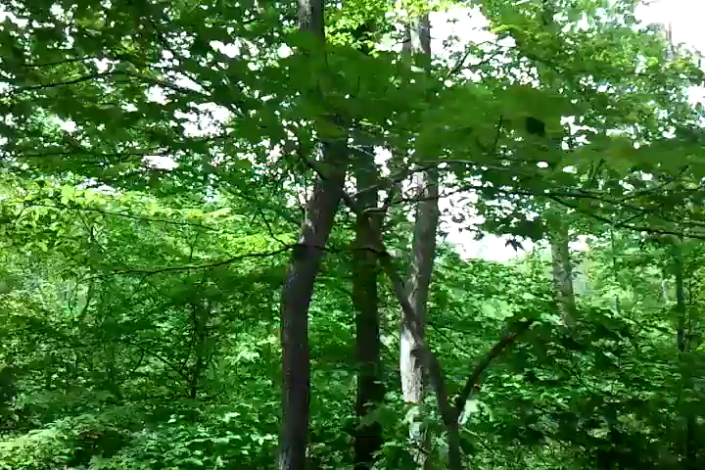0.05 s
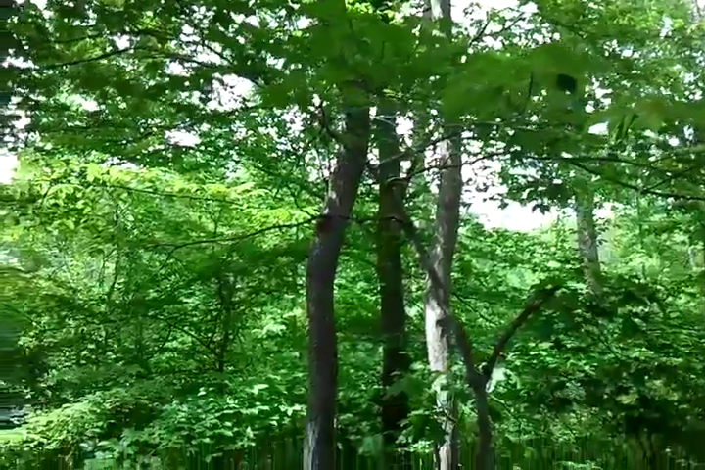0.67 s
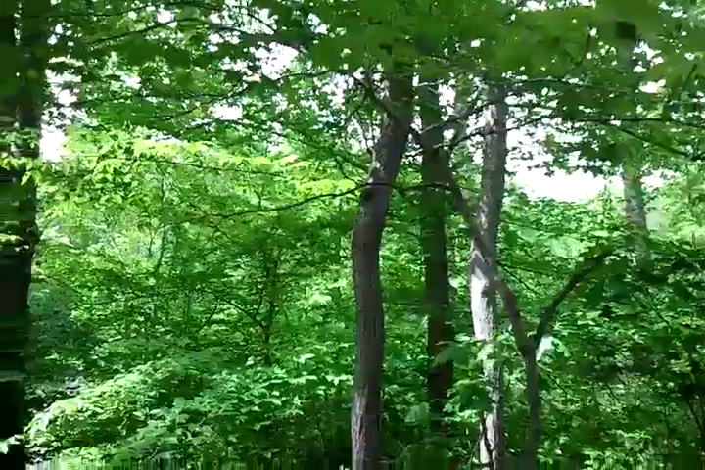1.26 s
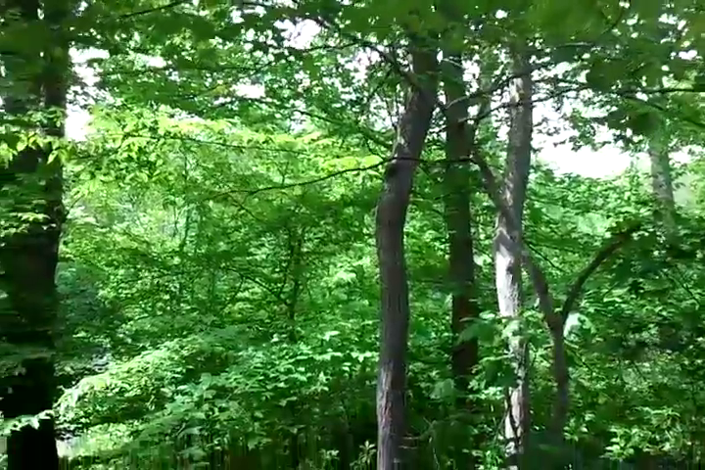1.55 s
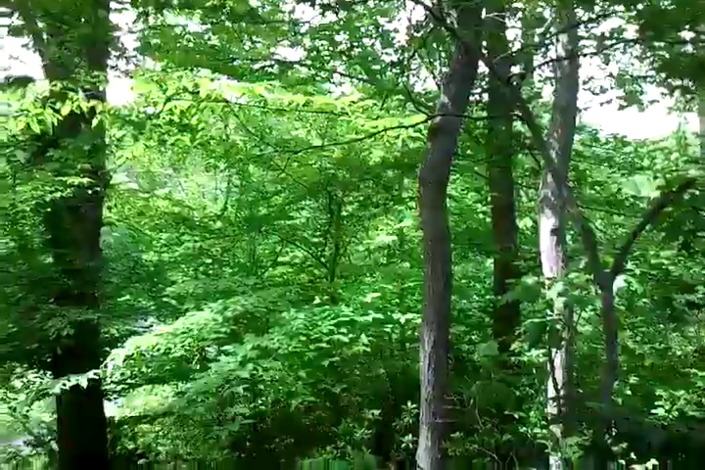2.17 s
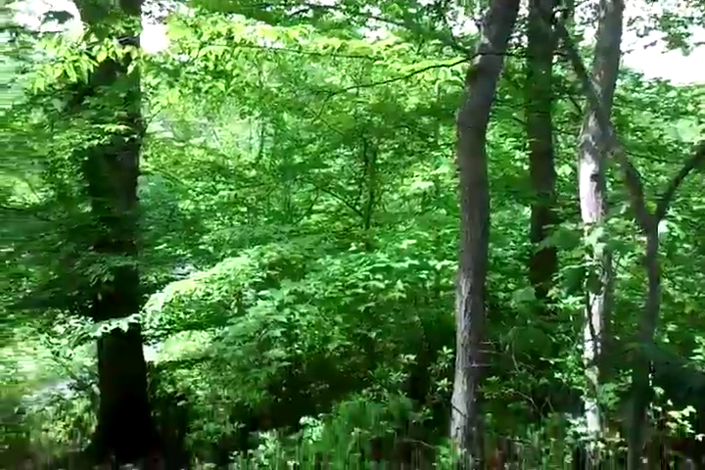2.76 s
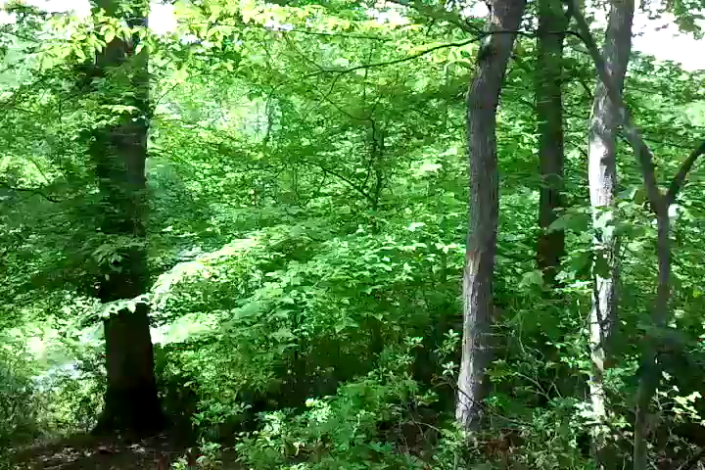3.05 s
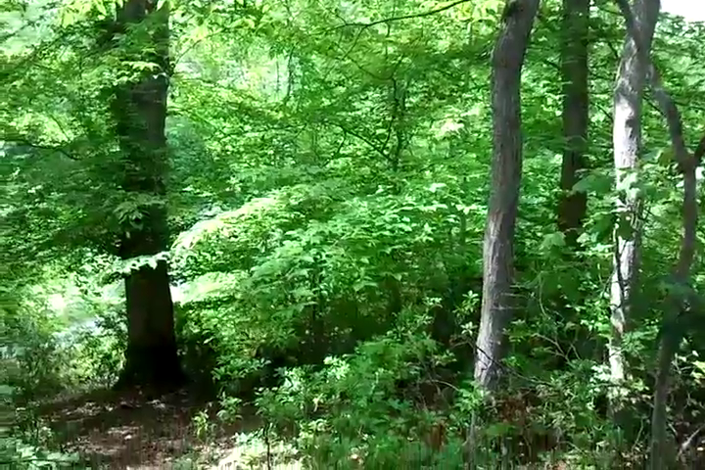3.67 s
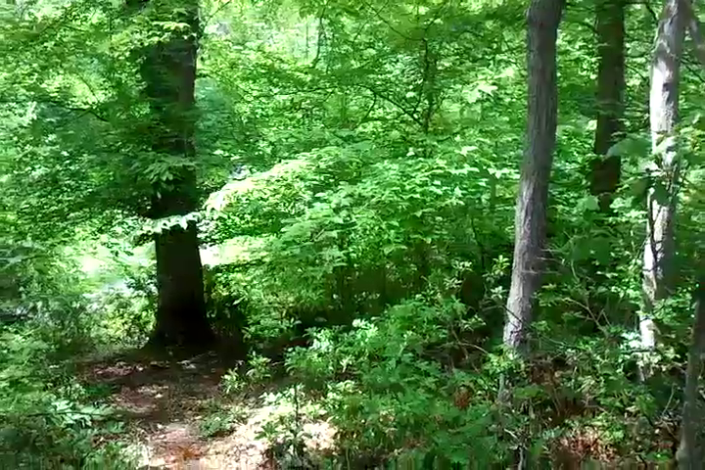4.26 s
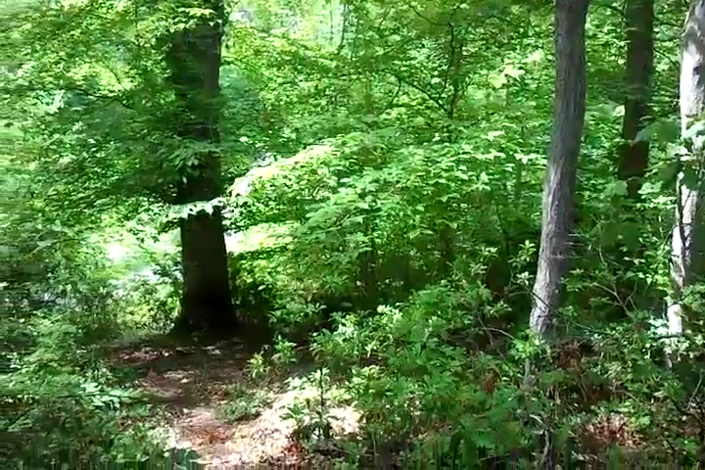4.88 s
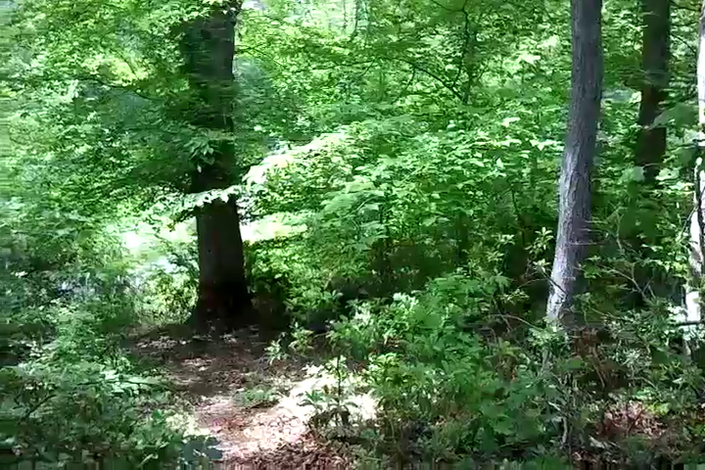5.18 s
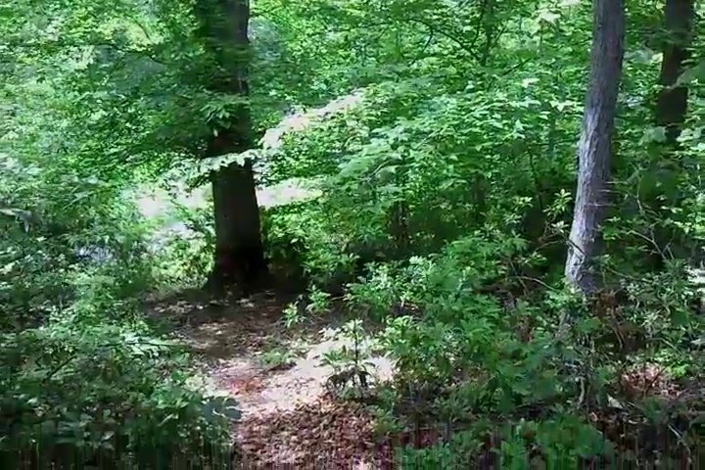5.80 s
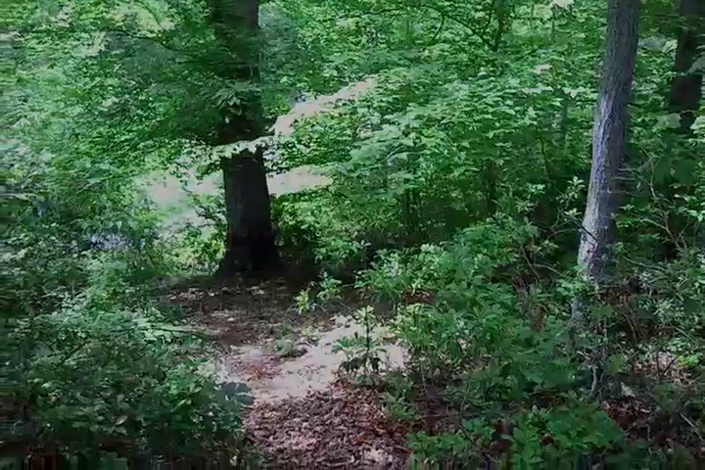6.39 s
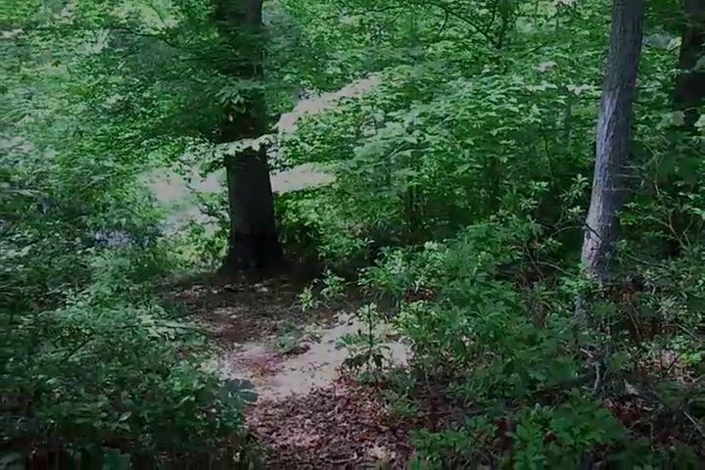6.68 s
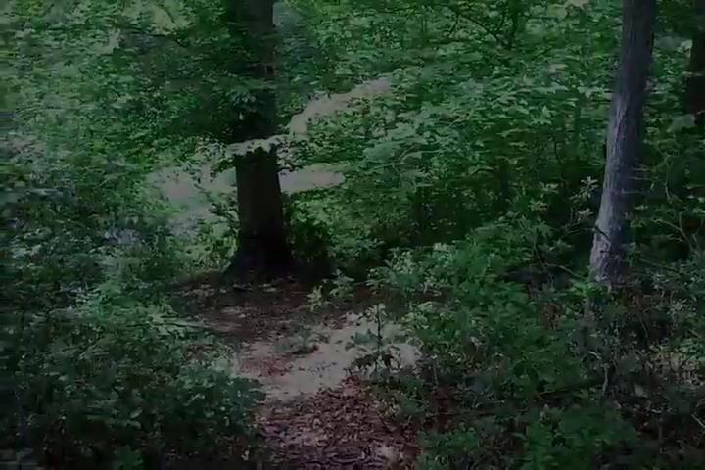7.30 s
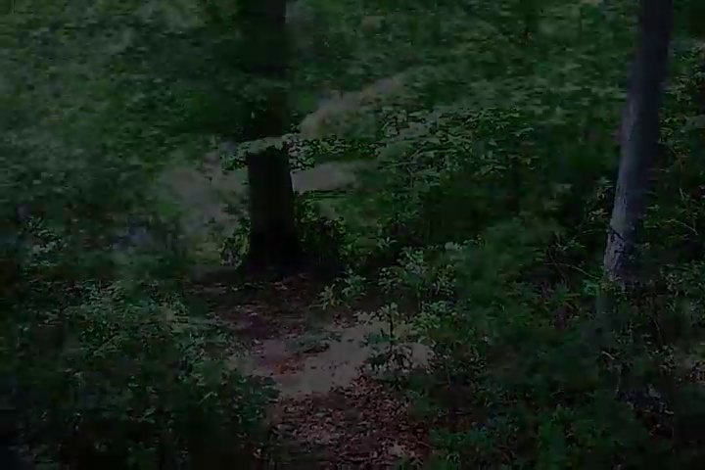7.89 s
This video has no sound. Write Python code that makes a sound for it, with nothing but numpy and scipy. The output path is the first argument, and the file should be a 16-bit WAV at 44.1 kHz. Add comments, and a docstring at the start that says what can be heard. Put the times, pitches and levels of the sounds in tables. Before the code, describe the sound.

Thousands of cicadas drone on one steady pitch high in forest trees, over a distant low rumble, soft treetop hiss and a faint shrill insect. The microphone distorts, giving the drone a harsh buzz. About five seconds in, the sound sputters and breaks up, then returns smooth and fades away. A bird gives a few faint, high chips near the end.

```python
"""A forest, where thousands of cicadas drone on one pitch high in the trees, their tymbals driving
resonant abdomens. Behind them lie distant rumble, treetop hiss and a far, shrill insect; a bird
chips near the end. The recorder's input sits far off centre, so the troughs of the drone are cut
flat and it buzzes, then sputters. As the sound fades the offset drifts back and the drone turns smooth."""
import sys
import numpy as np
from scipy import signal
from scipy.fft import rfft, irfft, next_fast_len
from scipy.io import wavfile

SR = 44100
rng = np.random.default_rng(int(sys.argv[2]) if len(sys.argv) > 2 else 0)


def dump_mix(stems):
    """Bounce the given channels to the path in sys.argv[1] as a 16-bit WAV at rate SR."""
    frames = np.atleast_2d(stems).T  # one column per channel
    limited = np.clip(frames, -1, 1)  # hard clip at full scale
    pcm = np.round(limited * 32767).astype(np.int16)
    wavfile.write(sys.argv[1], SR, pcm)


N = 354696

# Tones of the electronics. Each row: frequency in Hz, rms level in dB.
WHINE_TONES = [(7800, -90.5), (11698, -99)]
# Spectra of the noise bands. Each row: frequency in Hz, relative spectral density in dB.
RUMBLE_SPECTRUM = [(20, -3), (60, 1), (130, 0.5), (190, -2), (240, -7.5), (305, -4.5), (360, -10),
                   (600, -14), (900, -18.5), (2000, -49.5)]
TREETOP_SPECTRUM = [(900, -22.5), (1900, 2), (2500, 1), (2950, -3.5), (3300, -9), (4300, -10.5),
                    (5000, -18), (5500, -22.5), (6000, -34), (6400, -33.5), (7200, -57.5)]
CHORUS_SPECTRUM = [(650, -64), (780, -31.5), (870, -18), (1000, -20), (1100, -16.5), (1200, -6.5),
                   (1280, -4), (1355, 0), (1425, -2), (1500, -10), (1650, -19.5), (1900, -30.5),
                   (2400, -43.5), (3200, -72.5)]
SHRILL_SPECTRUM = [(4800, -24.0), (5500, 2.5), (6100, -1.5), (6900, -25.0)]
# The bird's chips. Each row: start and length in seconds, first and last pitch in Hz, peak level in dB.
BIRD_NOTES = [(7.008, .035, 4750, 4100, -52), (7.43, .05, 4820, 4720, -53), (7.495, .072, 4710, 4770, -56),
              (7.564, .055, 3360, 3060, -49.5), (7.587, .015, 3130, 2510, -46),
              (7.71, 0.026, 4850, 3500, -49), (7.771, .036, 3960, 2760, -48)]
# Dips in the drone. Each row: centre and length in seconds, gain at the centre in dB.
DRONE_LULLS = [(4.986, 0.046, -3), (5.147, .035, -13), (5.218, .025, -5), (5.316, .028, -13),
               (5.417, .03, -4), (5.659, .03, -4)]
# Single rasps of the drone. Each row: centre and length in seconds, crest in dB over the forest level.
DRONE_SURGES = [(0.545, 0.01, 7), (0.663, 0.026, 10), (4.24, .012, 11), (4.671, 0.0079, 11.5),
                (4.88, 0.018, 10), (5.071, 0.0087, 10), (5.18, 0.015, 7), (5.282, 0.012, 11),
                (5.327, 0.0058, 9.5), (5.361, 0.0065, 10.5), (5.392, 0.014, 9), (5.63, 0.0087, 9),
                (6.397, .016, 8.5), (6.52, 0.019, 11.5)]
# Chorus and air hold, then fade. Each row: time in seconds, gain in dB.
FOREST_LEVEL = [(0, -19.5), (3.6, -19), (4.12, -22), (4.3, -19.3), (5.3, -18.8), (6.1, -21), (7.0, -26),
                (7.7, -27.5), (8.04, -34)]
# The input's resting level drifts about the lower rail, sinks below it, then recovers.
# Each row: time in seconds, offset as a fraction of full scale.
INPUT_OFFSET = [(0, -0.72), (1.2, -0.72), (1.68, -0.69), (1.83, -.65), (2.2, -.67), (2.5, -.72),
                (2.9, -.695), (3.92, -0.71), (4.16, -.605), (4.33, -.72), (4.92, -.782), (5.28, -.835),
                (5.68, -.805), (5.83, -.72), (6.3, -.59), (6.95, -0.4), (7.55, -0.31), (8.04, -0.17)]


def amp(db):
    """Decibels to amplitude ratio."""
    return 10 ** (np.asarray(db) / 20)


def unit(x):
    """Normalisation to rms 1."""
    return x / np.sqrt(np.mean(x ** 2) + 1e-20)


def curve(rows):
    """Linear interpolation of (seconds, value) rows at every sample."""
    return np.interp(np.arange(N) / SR, *np.transpose(rows))


def wobble(rate):
    """Random modulation of rms 1, with rate knots a second."""
    at = np.arange(N) * rate / SR
    knots = rng.standard_normal(int(at[-1]) + 2)
    return unit(np.interp(at, np.arange(len(knots)), knots))


def bump(centre_s, length_s):
    """A raised-cosine window, from 0 to 1 and back."""
    u = (np.arange(N) / SR - centre_s) / length_s
    return np.where(np.abs(u) < .5, np.cos(np.pi * u) ** 2, 0)


def filtered(x, response):
    """Linear filtering: the spectrum of x is multiplied by a frequency response."""
    size = next_fast_len(N + SR // 4)
    return irfft(rfft(x, size) * response(np.fft.rfftfreq(size, 1 / SR)), size)[:N]


def noise(spectrum):
    """Spectral shaping: noise of rms 1 follows (Hz, dB) points on a log frequency axis."""
    points_hz, db = np.transpose(spectrum)

    def response(hz):
        return amp(np.interp(np.log(hz + 1), np.log(points_hz), db, right=-120))
    return unit(filtered(rng.standard_normal(N), response))


def electronics():
    """Self-noise: the recorder's circuits add a thin whine and white hiss."""
    t = np.arange(N) / SR
    whine = sum(np.sqrt(2) * amp(db) * np.sin(2 * np.pi * hz * t) for hz, db in WHINE_TONES)
    return whine + amp(-96.5) * rng.standard_normal(N)


def air():
    """Broadband ambient noise: low rumble from far away and faint hiss from the treetops."""
    return amp(-16.5) * noise(RUMBLE_SPECTRUM) + amp(-23.5) * noise(TREETOP_SPECTRUM)


def shrill_insect(hold_from_s=1.1, hold_until_s=4.8, rise_s=1.1, fall_s=0.9, again_s=7.58):
    """Narrow-band noise grows exponentially, holds and decays, then returns briefly and faintly."""
    t = np.arange(N) / SR
    fade = np.maximum(hold_from_s - t, 0) / rise_s + np.maximum(t - hold_until_s, 0) / fall_s
    first_call = amp(-51.5 - 14.5 * fade)
    second_call = amp(-66.5 - 33 * np.abs(t - again_s))  # 33 dB a second either side of the peak
    return (first_call + second_call) * noise(SHRILL_SPECTRUM)


def bird(t60_s, echo_db, waver):
    """Frequency modulation roughens short, mostly falling whistles; trunks scatter them into reverb."""
    call = np.zeros(N)
    quiver = waver * wobble(500)
    for start_s, length_s, first_hz, last_hz, db in BIRD_NOTES:
        progress = np.linspace(0, 1, int(length_s * SR))
        onset = int(start_s * SR)
        span = slice(onset, onset + len(progress))
        pitch_hz = first_hz + (last_hz - first_hz) * (progress + quiver[span])  # wider slurs are hoarser
        envelope = amp(db) * np.sqrt(np.abs(np.sin(np.pi * progress)))
        call[span] += envelope * np.sin(2 * np.pi * np.cumsum(pitch_hz) / SR)
    t = np.arange(SR // 2) / SR
    tail = rng.standard_normal(len(t)) * amp(-60 * t / t60_s)
    echo = signal.fftconvolve(call, tail / np.linalg.norm(tail))[:N]
    return call + amp(echo_db) * echo


def near_cicadas(centre_hz, spread_hz, waver_hz, flutter_db, count):
    """Resonance: each abdomen rings on its own wavering pitch and flutters with its tymbals."""
    song = np.zeros(N)
    for detuning in np.linspace(-1, 1, count):
        pitch_hz = centre_hz + spread_hz * detuning + waver_hz * wobble(15)
        flutter = amp(flutter_db * wobble(60))
        song += flutter * np.sin(2 * np.pi * (np.cumsum(pitch_hz) / SR + rng.random()))
    return unit(song)


def throbbing(song, pitch_hz):
    """Amplitude fluctuation: the drone dips in brief lulls, or surges for a moment into a stronger tone."""
    for centre_s, length_s, db in DRONE_LULLS:
        song = song * (1 - (1 - amp(db)) * bump(centre_s, length_s))
    tone = np.sin(2 * np.pi * (pitch_hz * np.arange(N) / SR + rng.random()))
    for centre_s, length_s, db in DRONE_SURGES:
        song = song + bump(centre_s, length_s) * (amp(db) * tone - song)
    return song


def cicada_chorus(swell_db=.5, swells_per_s=6):
    """Incoherent addition: far cicadas merge into a narrow noise band, with nearer ones at its centre."""
    far = amp(-1.7) * noise(CHORUS_SPECTRUM)
    near = amp(-5) * near_cicadas(centre_hz=1358, spread_hz=33, waver_hz=18, flutter_db=2.5, count=9)
    swell = amp(swell_db * wobble(swells_per_s))
    return throbbing(swell * (far + near), pitch_hz=1344)


def scene():
    """Superposition: chorus and air fade together; the bird and the shrill insect call through them."""
    forest = amp(curve(FOREST_LEVEL)) * (cicada_chorus() + air())
    return (forest + bird(t60_s=0.28, echo_db=-1.5, waver=.12) + shrill_insect())[None]


def record(dry):
    """Asymmetric clipping: the offset pushes the troughs against the lower rail, adding overtones."""
    rail, band_limit_hz = -.707, 15750
    offset = curve(INPUT_OFFSET)
    clipped = np.maximum(dry[0] + electronics() + offset, rail)
    rest = np.maximum(offset, rail)  # the slow resting level passes the band limit unchanged
    return (rest + filtered(clipped - rest, lambda hz: hz < band_limit_hz))[None]


dry = scene()
out = record(dry)
dump_mix(out)
```